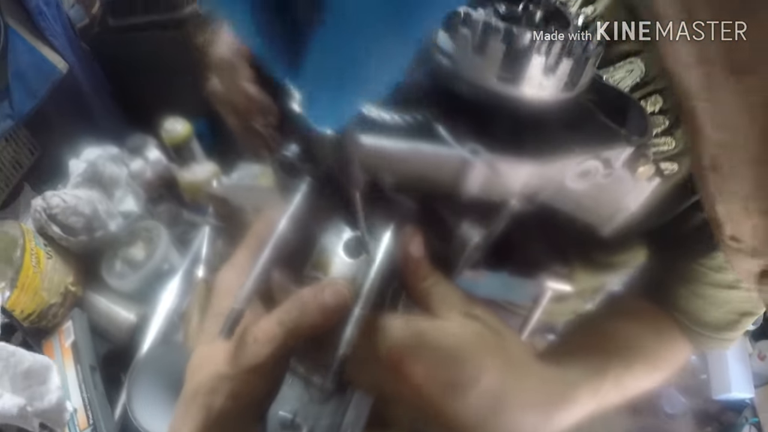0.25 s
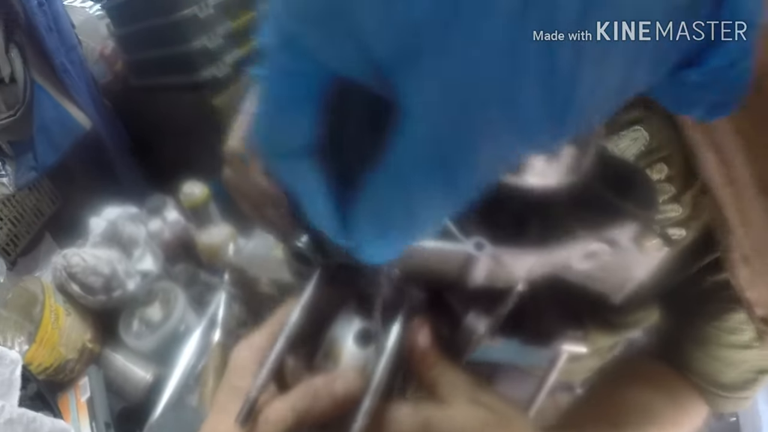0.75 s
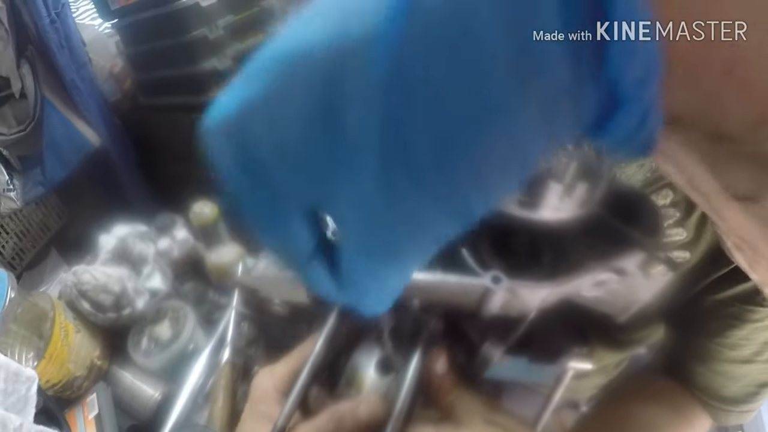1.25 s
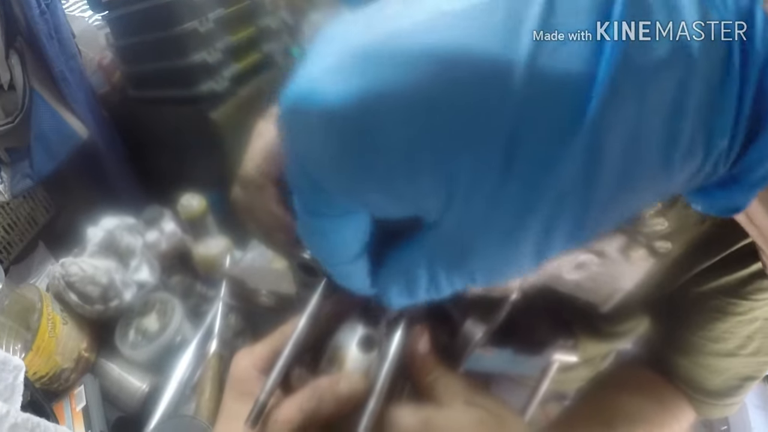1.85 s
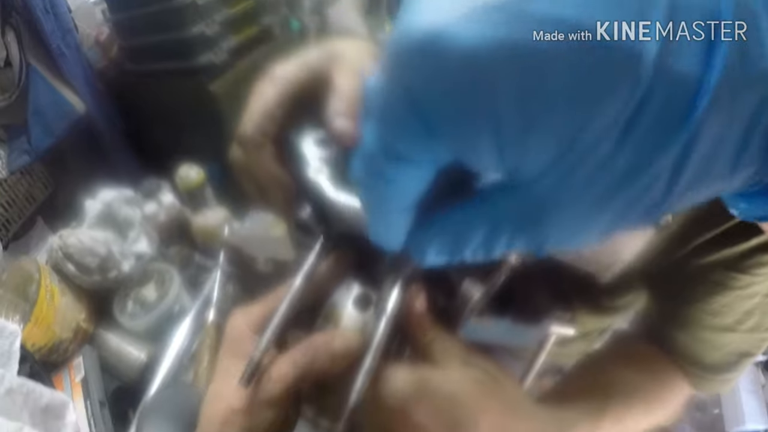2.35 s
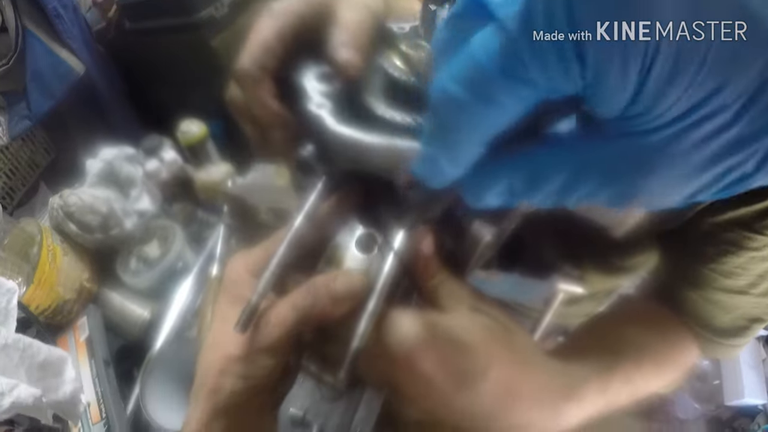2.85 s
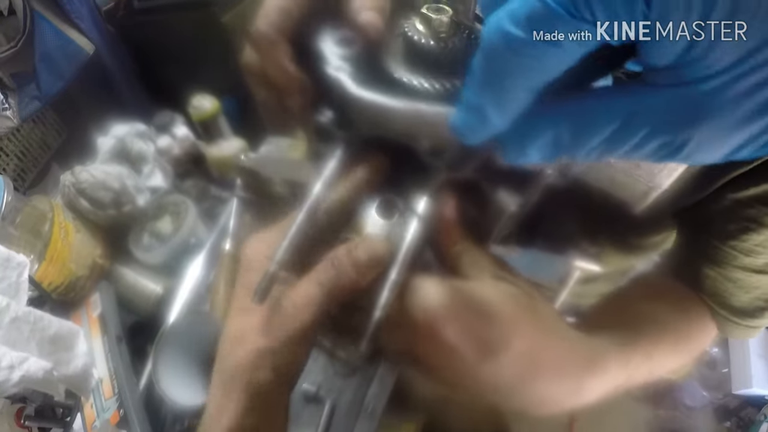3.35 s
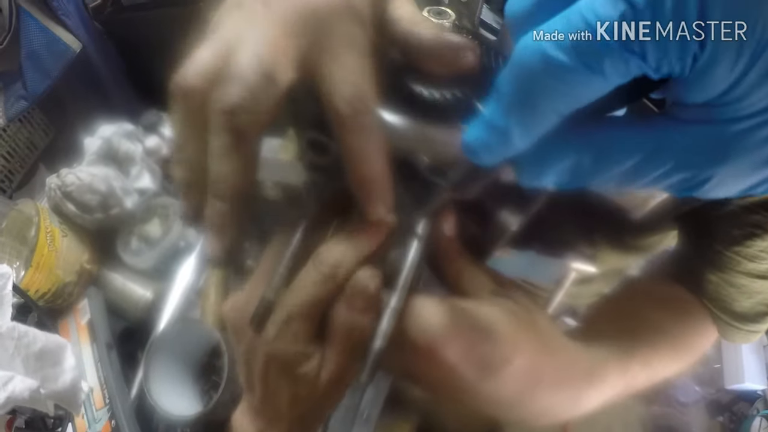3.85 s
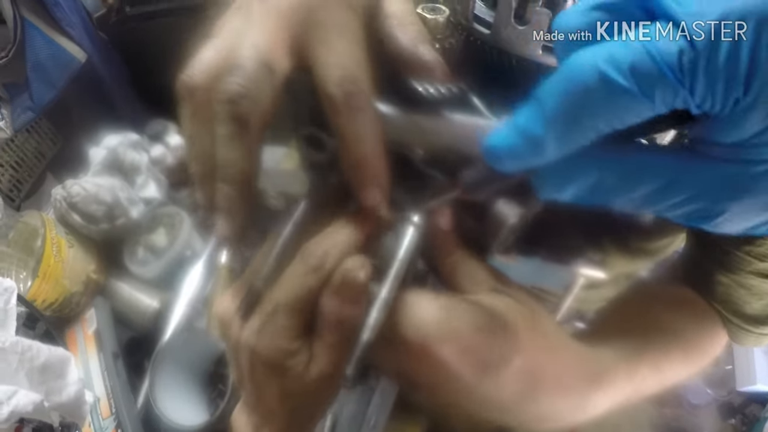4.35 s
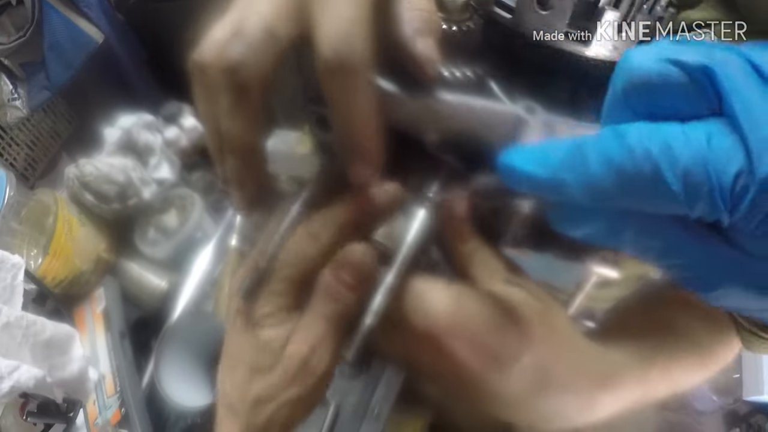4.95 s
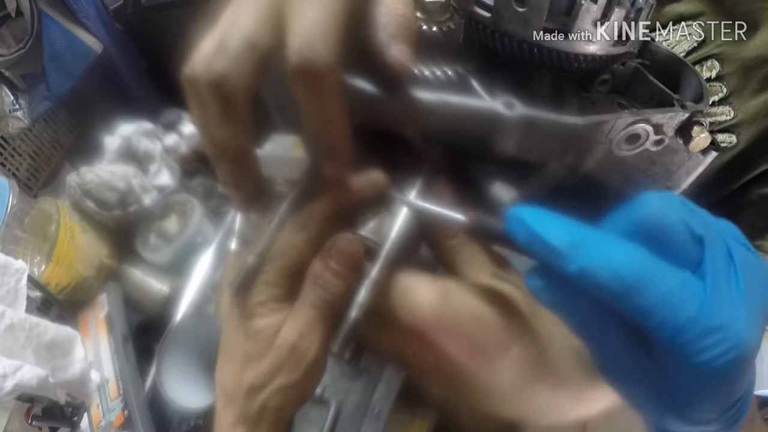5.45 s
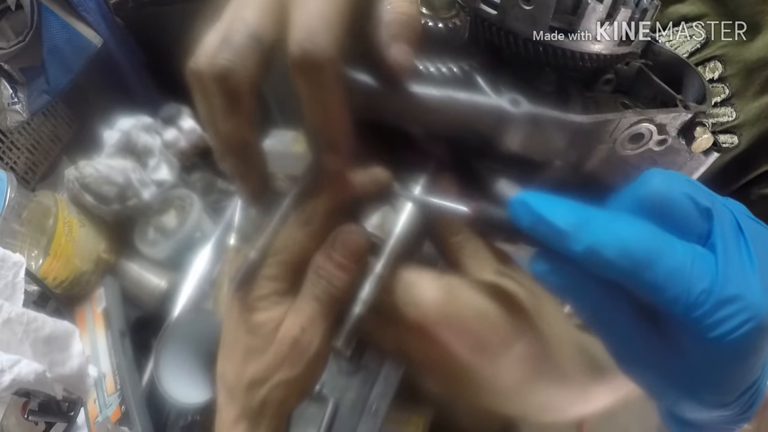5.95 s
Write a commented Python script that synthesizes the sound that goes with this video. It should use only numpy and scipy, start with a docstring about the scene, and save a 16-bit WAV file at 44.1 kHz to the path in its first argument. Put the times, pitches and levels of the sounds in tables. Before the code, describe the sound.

Mostly quiet close-up workshop sound: deep soft room rumble, distant traffic swelling gently early on, faint hiss. A few light clicks on an aluminium casing, a muffled knock, low bumps and soft rubber rubbing. Small raspy chirps twitter faintly behind. Late on, a tool slips and strikes hard with a crisp clank and scrape, followed by a smaller click whose high metallic ring shimmers away in a short room echo.

```python
"""A low workshop rumble is heard first, soon with light contacts of steel on a moped's aluminium casing.
Filtered noise makes the cracks, rubs, air, far traffic and hiss; decaying sines make the casing, bench and pin ring.
A tool scrapes by random slips that excite the casing's modes; soft bumps are short sways of the bench.
Thin chirps like those of small birds are gliding sines that fray into a rasp; a noise tail adds the room."""
import sys
import numpy as np
from scipy import signal
from scipy.fft import rfft, irfft, next_fast_len
from scipy.io import wavfile
from scipy.ndimage import map_coordinates

SR = 44100
rng = np.random.default_rng(int(sys.argv[2]) if len(sys.argv) > 2 else 0)


def unload_audio(sound):
    """Save the sound as a 16-bit wav file, at the path given as the first command line argument."""
    columns = np.transpose(np.atleast_2d(sound))
    # keep every value between -1 and 1, then stretch to whole-number steps
    steps = np.round(np.clip(columns, -1, 1) * 32767)
    wavfile.write(sys.argv[1], SR, steps.astype(np.int16))


N = 272979

# modes of the aluminium casing: (frequency [Hz], relative level [dB], t60 [s])
CASING_MODES = [(838, -15, .05), (1190, -21, .04), (1480, -14, .035), (1630, -9, .016), (1985, 7, .013),
                (2352, -1, .02), (2665, -11, .026), (3060, -17, .03), (3395, 3.5, .021), (3553, -19, .04),
                (3940, -10, .025), (4290, -19, .03), (5090, -9, .022), (5830, 11.5, .010),
                (7400, -13, .016), (9050, -21, .02), (13800, -21, .015)]


def amp(db):
    """Convert a level in decibels to a linear gain."""
    return 10 ** (np.asarray(db) / 20)


def unit(x):
    """Normalize a signal to an rms value of 1."""
    return x / np.sqrt(np.mean(x ** 2) + 1e-20)


def along(points, hz):
    """Interpolate (frequency [Hz], value) points on a logarithmic frequency axis."""
    f, v = np.transpose(points)
    return np.interp(np.log(hz + 1), np.log(f + 1), v)


def clock(count):
    """Time of each sample in seconds."""
    return np.arange(count) / SR


def wobble(rate):
    """Smooth random modulation: a spline through rate Gaussian knots a second."""
    knots = rng.standard_normal(int(N * rate / SR) + 4)
    return map_coordinates(knots, [clock(N) * rate])


def filtered(x, response):
    """Linear filtering: multiply the spectrum of x by a response of frequency."""
    m = next_fast_len(len(x) + SR // 4)
    spectrum = rfft(x, m) * response(np.fft.rfftfreq(m, 1 / SR))
    return irfft(spectrum, m)[:len(x)]


def noise(spectrum):
    """Coloured noise of rms 1: white noise shaped by (frequency [Hz], relative level [dB per Hz])."""
    white = rng.standard_normal(N)
    return unit(filtered(white, lambda hz: amp(along(spectrum, hz))))


def gate(start, end, fade):
    """Amplitude window between two times with sine-squared edges."""
    t = clock(N)
    edge = np.clip(np.minimum(t - start, end - t) / fade, 0, 1)
    return np.sin(np.pi / 2 * edge) ** 2


def dying(t, t60):
    """Exponential decay by 60 dB in t60 seconds."""
    return np.exp(-np.log(1000) * t / t60)


def ring(modes, scatter_db):
    """Modal superposition: half a second of damped sines, excited anew in random strengths."""
    t = clock(SR // 2)
    total = np.zeros(len(t))
    for k, (hz, db, t60) in enumerate(modes):
        strength = (-1) ** k * amp(db + scatter_db * rng.standard_normal())
        total += strength * dying(t, t60) * np.sin(2 * np.pi * hz * t)
    return total


def add(track, s, sound):
    """Superpose a sound on a track from time s."""
    part = track[max(round(s * SR), 0):][:len(sound)]
    part += sound[:len(part)]


def clanks():
    """Impact excitation: each contact cracks, and a firmer one puts a larger share into the casing's modes."""
    # steel meets the casing: (time [s], crack level [dB], crack centre [Hz], sharp-edge level [dB])
    contacts = [(0.0951, -70.5, 5000, -55), (0.2975, -45, 4041, -42), (0.3655, -54.5, 3369, -74.5),
                (1.5544, -43.5, 3000, -88), (2.4488, -66.5, 5500, -47.5), (4.2998, -47.5, 2196, -72.5),
                (4.3738, -53.5, 3208, -74), (4.45, -31.5, 2402, -57.5), (4.4568, -32, 2420, -48.5),
                (4.46, -33.5, 2810, -32.5), (4.4734, -11.5, 2700, -25), (4.5033, -33, 4792, -42.5),
                (4.5754, -46, 2970, -64.5), (4.845, -52, 3700, -68.5), (4.9801, -51.5, 4480, -64.5),
                (5.269, -47.5, 2850, -63.5), (5.3246, -26, 3450, -27.5), (6.1, -51, 1484, -54)]
    # spectrum of a crack: (multiple of its centre [ratio], relative level [dB per Hz])
    crack_shape = [(.1, -10.5), (.4, -10), (.8, 2.5), (1.15, -2), (1.7, -5.5), (2.6, -19.5), (6, -37.5)]
    edge_spectrum = [(2000, -11.5), (5000, 6.5), (9000, 1.5), (15000, -7)]
    light_ring_db = -24.5  # ring share of a light contact, relative to its crack
    firm_db = -9  # crack level that adds a ring share of 1
    out, t = np.zeros(N), clock(SR // 2)
    crack_decay = dying(t, .018) + amp(-24.5) * dying(t, 0.15)
    for s, db, centre_hz, edge_db in contacts:
        crack = noise([(centre_hz * k, level) for k, level in crack_shape])[:len(t)] * crack_decay
        tick = noise(edge_spectrum)[:len(t)] * dying(t, 0.013)
        ring_share = np.hypot(amp(light_ring_db), amp(db - firm_db))
        casing = ring_share * ring(CASING_MODES, scatter_db=1.5)
        add(out, s, amp(db) * (crack + casing) + amp(edge_db) * tick)
    return out


def scrapes():
    """Stick-slip friction: tiny uneven slips keep the casing's modes ringing, and each stroke eases off."""
    # the tool drags over the casing: (start [s], end [s], initial level before the fade [dB])
    strokes = [(4.316, 4.392, -56), (4.456, 4.475, -26), (4.482, 4.599, -49), (5.101, 5.194, -66.5)]
    tint = [(500, -2.5), (1700, -1.5), (2600, 5.5), (3400, 1), (5800, -8), (8000, -10), (14000, -15.5)]
    slips_per_s, fade_s, catch_db = 4000, 0.0042, 0.5  # mean slip rate, stroke edge, uneven bite
    ease_db_per_s = 92  # a stroke weakens as the tool slows
    slipping = rng.random(N) < slips_per_s / SR
    slips = rng.standard_normal(N) * slipping * amp(catch_db * wobble(120))
    ringing = signal.fftconvolve(slips, ring(CASING_MODES, scatter_db=1.5))[:N]
    grind = unit(ringing) + amp(1.0) * unit(slips)
    grind = filtered(grind, lambda hz: amp(along(tint, hz)))
    stroke_gain = np.zeros(N)
    for start, end, db in strokes:
        easing_db = db - ease_db_per_s * np.abs(clock(N) - start)
        stroke_gain += amp(easing_db) * gate(start, end, fade_s)
    return grind * stroke_gain


def knocks():
    """Modal response to impact: the rocking engine knocks the bench and sets a loose cover singing."""
    # the engine rocks on the bench: (time [s], knock peak level [dB], cover level [dB])
    blows = [(1.5519, -24, -44.5), (4.298, -27.5, -63.5), (4.475, -19, -26), (5.108, -51.5, -69.5),
             (5.144, -43, -63.5), (5.194, -57, -71), (5.271, -44, -69), (5.326, -45.5, -57)]
    # modes of the bench: (frequency [Hz], relative level [dB], t60 [s])
    bench_modes = [(121.4, -14.5, 0.056), (232.92, 1, 0.047), (300, 0, 0.04), (383, 2, .04),
                   (515.3, -7, 0.057), (638.36, -6, 0.033), (915.75, -13, 0.04), (1083.5, -11, 0.042)]
    cover_hz, cover_t60_s, cover_rise_s = 449, .36, .0019
    out, t = np.zeros(N), clock(SR // 2)
    cover_envelope = dying(t, cover_t60_s) * (1 - np.exp(-t / cover_rise_s))
    cover = np.sin(2 * np.pi * cover_hz * t) * cover_envelope
    for s, db, cover_db in blows:
        wood = ring(bench_modes, scatter_db=0.5)
        add(out, s, amp(db) * wood / np.abs(wood).max() + amp(cover_db) * cover)
    return out


def pin():
    """Beating of close modes: the struck steel pin rings, and a slow rise favours modes near 8 kHz."""
    # strikes on the pin: (time [s], level before grip and beating [dB], rise time [s])
    strikes = [(5.3255, -42.5, 0.0003427), (5.343, -43, 0.0048), (6.100, -69.5, 0.002699)]
    # modes of the pin: (frequency [Hz], relative level [dB], t60 [s])
    pin_modes = [(767, 5, 0.0745), (2670, -2, .1), (3372.6, 5, .055), (7864.8, -3, 0.36), (8000, -26, .28),
                 (7950, 2, 0.41615), (8027, -4, 0.48), (8084.5, 12, 0.0745), (8431, 0.5, 0.11),
                 (13540, -10, 0.1255), (13880, -7, 0.0618), (14184, -3, .045)]
    out, t = np.zeros(N), clock(SR // 2)
    grip = amp(-11.5) + dying(t, 0.1472)  # fingers damp the first strong swing
    for s, db, rise in strikes:
        modes = []
        for hz, level, t60 in pin_modes:
            loss = 1 + np.log2(hz / 8000) ** 2 * rise / 0.002427
            modes.append((hz, level - 20 * np.log10(loss), t60))
        onset = 1 - np.exp(-(t / rise) ** 2)
        add(out, s, amp(db) * ring(modes, scatter_db=5.5) * grip * onset)
    return out * amp(2.53 * wobble(200))  # the ring beats irregularly, as in a cluttered room


def bumps():
    """Damped low-frequency sway: soft pushes move the bench for a cycle or two under a Gaussian envelope."""
    # soft bumps of the hands: (middle time [s], level [dB], sway frequency [Hz])
    pushes = [(.636, -28, 103.2), (.654, -33, 120.7), (0.684, -25.5, 58.02), (.737, -36.5, 57.92),
              (1.583, -38, 59.74), (2.409, -31.5, 59.79), (2.450, -29, 56.55), (4.482, -18.5, 63.42)]
    half_length = 0.62  # cycles of the sway
    out = np.zeros(N)
    for s, db, hz in pushes:
        cycles = hz * (clock(N) - s)
        out += amp(db) * np.exp(-(cycles / half_length) ** 2) * np.sin(2 * np.pi * cycles)
    return out


def gloves():
    """Sliding friction: rubber on metal gives grainy swishes of coloured noise."""
    # gloves slide over metal: (start [s], end [s], level [dB])
    slides = [(0.755, 0.908, -58), (3.405, 3.595, -65.5), (3.604, 3.839, -69)]
    # spectrum of the rub: (frequency [Hz], relative level [dB per Hz])
    rub_spectrum = [(300, -6), (1500, -4), (2800, -9), (3450, -1.5), (4400, -9.5), (6000, -13),
                    (7000, -17.5), (15000, -30)]
    stroke = sum(amp(db) * gate(start, end, fade=0.04217) for start, end, db in slides)
    grain = amp(1.109 * wobble(150))
    return stroke * unit(noise(rub_spectrum) * grain)


def arch(start, crest, end, flatness):
    """Effort envelope: a power-law arch from 0 to 1 at the crest and back."""
    distance = np.interp(clock(N), [start, crest, end], [1, 0, 1])
    return 1 - distance ** abs(flatness)


def chirps():
    """Frequency and phase modulation: effort lifts a trembling whistle, and hoarseness frays it into a rasp."""
    # chirps: (start [s], crest [s], end [s], crest pitch before the sag [Hz], flatness of the arch [exponent],
    # sag at the crest [Hz], then levels at full effort before flutter: whistle [dB], octave [dB], rasp [dB])
    calls = [(1.345, 1.425, 1.515, 4650, 1.5, 0, -69, -85, -60),
             (1.61, 1.705, 1.865, 4950, 1.5, 0, -64.5, -80, -57),
             (1.905, 2.005, 2.11, 4600, 3, 0, -63.5, -80, -66),
             (3.152, 3.253, 3.323, 5220, 1.3, 0, -62, -74, -58.5),
             (4.53, 4.61, 4.73, 5780, 3.4, 430, -55, -65, -66),
             (4.9, 4.968, 5.08, 4570, 1.6, 0, -62.5, -64, -73),
             (5.02, 5.1, 5.22, 3800, 2, 0, -80, -80, -64), (5.14, 5.3, 5.58, 5400, 2, 0, -88, -75, -82)]
    # noise in the rasp: (frequency [Hz], relative level [dB per Hz])
    rasp_spectrum = [(2500, -26.5), (3600, -1.5), (5500, -2.5), (8000, -4), (10200, -6), (11000, -14),
                     (15000, -14.5)]
    rest_hz, sag_s = 3330, 0.019  # pitch at zero effort, half length of the sag
    whistle_swell_db, rasp_swell_db = 1.5, 12  # growth from no effort to full effort
    clean_fray, hoarse_fray = .18, .7  # phase noise [rad]: clean, and added per unit of hoarseness
    out = np.zeros(N)
    rasp = noise(rasp_spectrum)
    tremble, flutter = 1 + 0.0059 * wobble(200), amp(3.8 * wobble(70))
    fray = wobble(1100)
    for start, crest, end, crest_hz, flatness, sag_hz, whistle_db, octave_db, rasp_db in calls:
        effort = arch(start, crest, end, flatness)
        sag = sag_hz * np.exp(-((clock(N) - crest) / sag_s) ** 2)
        pitch = rest_hz + (crest_hz - rest_hz) * effort - sag
        phase = 2 * np.pi * np.cumsum(pitch * tremble) / SR
        rasp_gain = amp(rasp_db + rasp_swell_db * (effort - 1))
        hoarse = np.clip(rasp_gain / amp(max(whistle_db, octave_db)), 0, 2)
        frayed = phase + (clean_fray + hoarse_fray * hoarse) * fray
        overtones = np.sin(2 * frayed) + amp(-6) * np.sin(1.5 * frayed)  # alternate cycles differ
        whistle = amp(whistle_db) * np.sin(frayed) + amp(octave_db) * overtones
        third_harmonic = flutter * np.sin(3 * phase + fray)
        harsh = amp(-4.5) * rasp + amp(-15.0) * third_harmonic
        whistle_gain = amp(whistle_swell_db * (effort - 1)) * flutter
        out += gate(start, end, fade=0.0046) * (whistle_gain * whistle + rasp_gain * harsh)
    return out


def workshop():
    """Stationary background: low rumble, hiss and mains hum, with far traffic that swells once and fades."""
    # the still room: (frequency [Hz], relative level [dB per Hz])
    air_spectrum = [(12, -26), (20, 1), (61, -5), (157, -23.5), (245, -23.5), (382, -30), (416, -33),
                    (452, -27), (565, -33.5), (746, -32.5), (811, -34), (1380, -36), (1670, -37),
                    (2400, -39), (15500, -59)]
    # far traffic: (frequency [Hz], relative level [dB per Hz])
    traffic_spectrum = [(300, -9), (700, -10.5), (1200, -4.5), (1600, -9.5), (2300, -19), (5000, -38.5)]
    # steady hiss: (frequency [Hz], relative level [dB per Hz])
    hiss_spectrum = [(1000, -6.5), (2700, -5), (3080, 2), (3400, -2.5), (5000, -2.5), (7000, -7),
                     (15000, -11.5)]
    # mains lines: (frequency [Hz], mean level [dB])
    hum_lines = [(49, -58.5), (196, -72.5), (246, -72.5), (345, -75.5), (393, -74.5)]
    air_db, traffic_db, hiss_db = -51, -60.5, -71
    pass_s, pass_half_s, pass_steep = 1.4787, 1.1073, 6.4  # loudest moment, half length, flank exponent
    t = clock(N)
    nearness = 1 / np.sqrt(1 + np.abs((t - pass_s) / pass_half_s) ** pass_steep)
    air = amp(air_db + 1.7 * wobble(7.4)) * noise(air_spectrum)
    traffic = nearness * amp(traffic_db + .5 * wobble(5.4)) * noise(traffic_spectrum)
    hiss = amp(hiss_db) * noise(hiss_spectrum)
    hum = np.zeros(N)
    for hz, db in hum_lines:
        level = amp(db + 0.62 * wobble(3.2))
        hum += level * np.sin(2 * np.pi * hz * t + 0.58 * wobble(1.1))
    return air + traffic + hiss + hum


def walls(x):
    """Reverberation: convolution with a noise tail whose decay time depends on frequency."""
    # decay of the cluttered room: (frequency [Hz], t60 [s])
    room_decay = [(100, 0.19), (500, .28), (3000, 0.15), (8000, 0.1), (15000, 0.26)]
    hz, t, z = signal.stft(rng.standard_normal(SR // 2), SR, nperseg=256)
    decay = dying(t, along(room_decay, hz)[:, None])
    tail = signal.istft(z * decay, SR, nperseg=256)[1]
    tail = tail * (1 - np.exp(-clock(len(tail)) / 0.0012))  # soft onset
    return signal.fftconvolve(x, tail / np.linalg.norm(tail))[:N]


def scene():
    """Superposition of direct sound, room reverberation and background."""
    metal, wood, steel, birds = clanks() + scrapes(), knocks(), pin(), chirps()
    # the casing beams its main modes at the listener, so the room receives less of them
    to_room = [(1400, 2.5), (2000, -6.5), (3000, -4.0), (4500, -4), (5800, -8), (8000, -1.5)]
    spread = filtered(metal, lambda hz: amp(along(to_room, hz)))
    echo = walls(amp(-15) * spread + amp(-7.5) * wood + amp(-8.0) * steel + amp(-14.0) * birds)
    return (metal + wood + steel + birds + echo + bumps() + gloves() + workshop())[None]


def record(dry):
    """Saturation and band limiting: the highest peaks are rounded, then a steep low-pass removes the top."""
    top_hz = 15400
    rounded = dry / (1 + np.abs(dry / .85) ** 6) ** (1 / 6)
    return np.array([filtered(x, lambda hz: 1 / (1 + (hz / top_hz) ** 120)) for x in rounded])


dry = scene()
out = record(dry)
unload_audio(out)
```